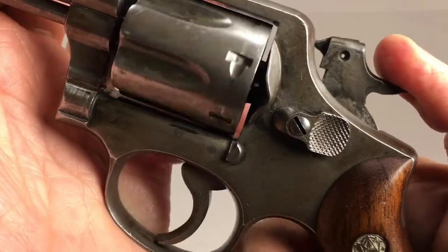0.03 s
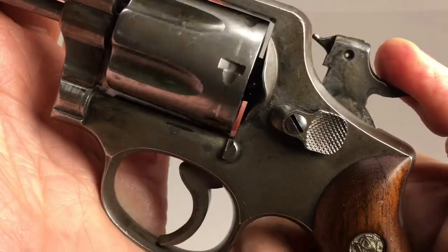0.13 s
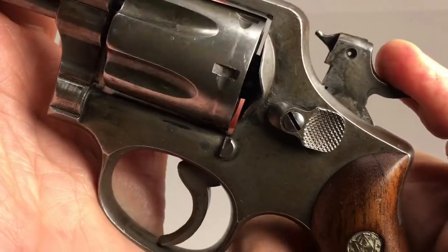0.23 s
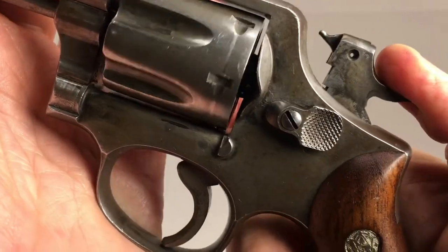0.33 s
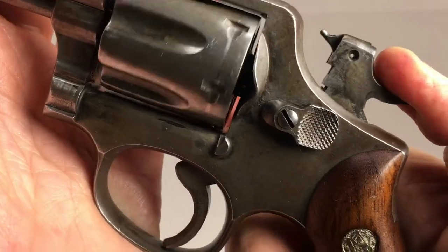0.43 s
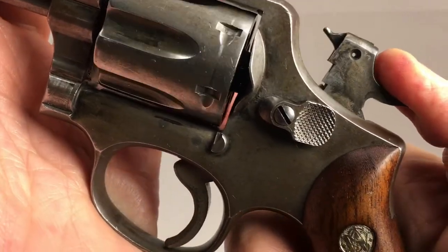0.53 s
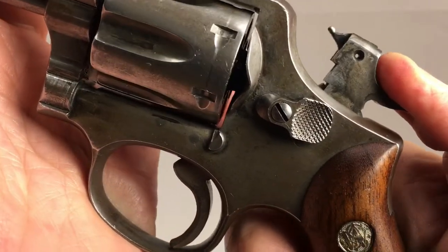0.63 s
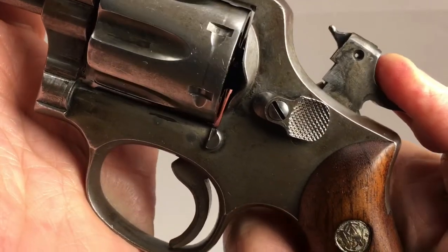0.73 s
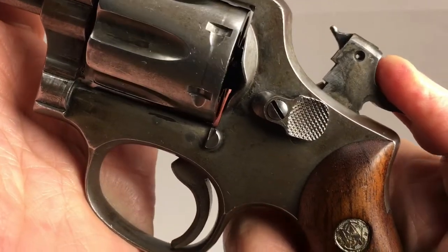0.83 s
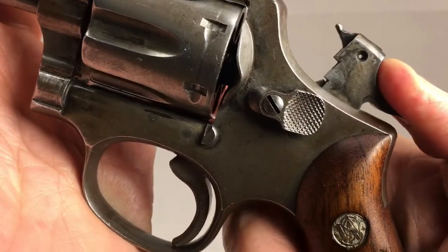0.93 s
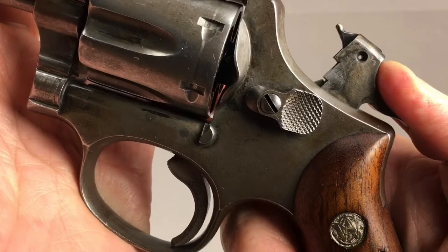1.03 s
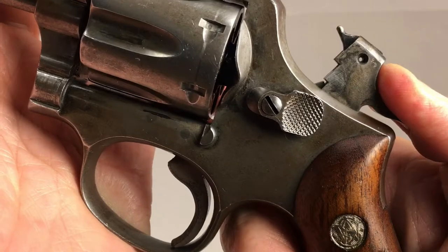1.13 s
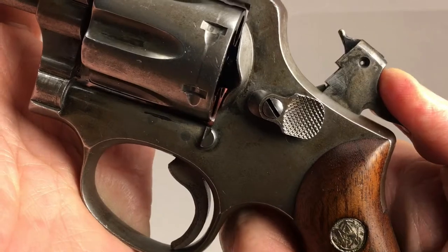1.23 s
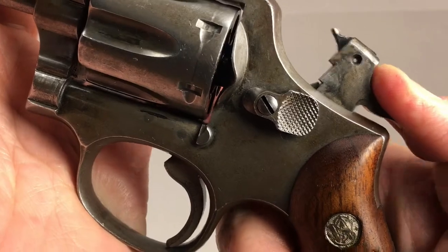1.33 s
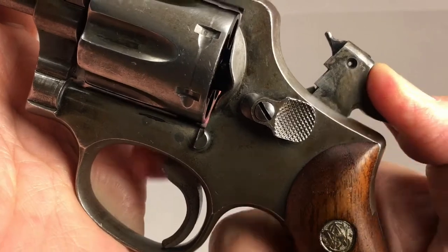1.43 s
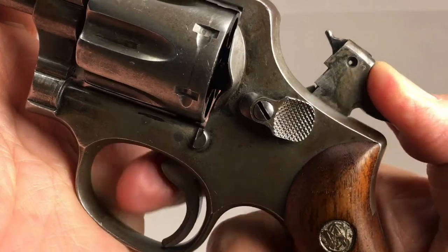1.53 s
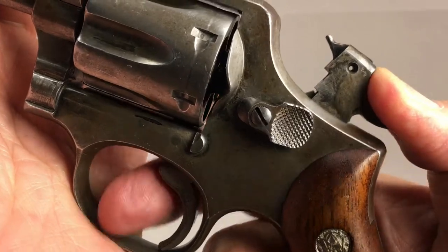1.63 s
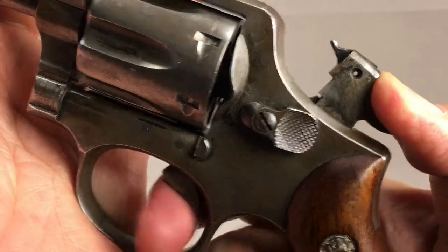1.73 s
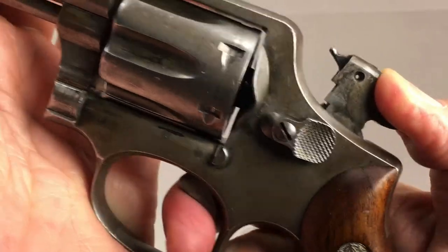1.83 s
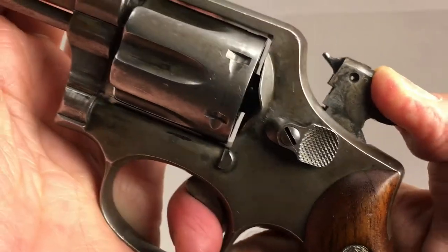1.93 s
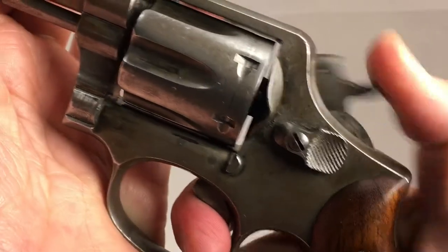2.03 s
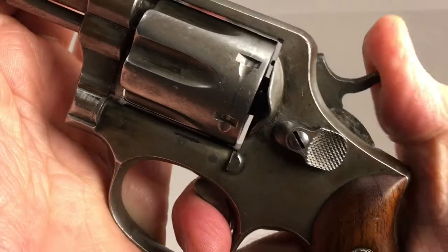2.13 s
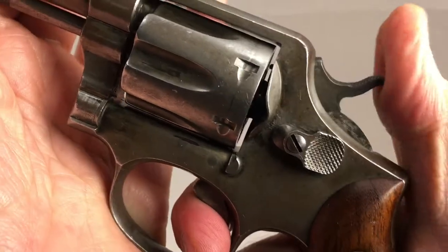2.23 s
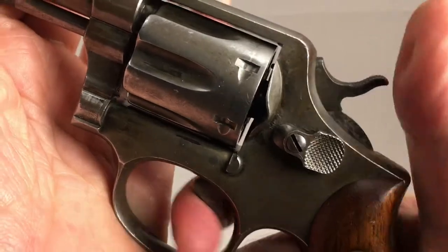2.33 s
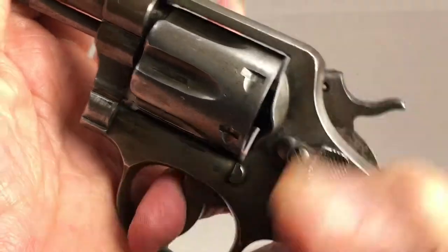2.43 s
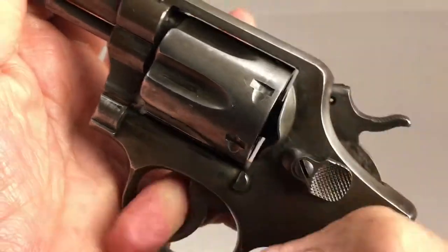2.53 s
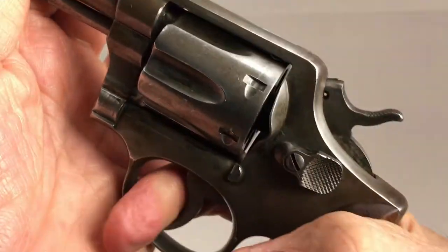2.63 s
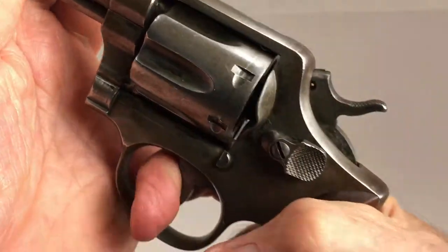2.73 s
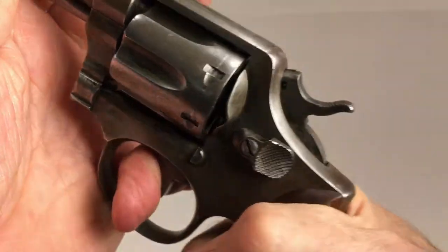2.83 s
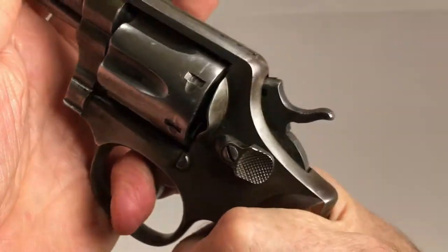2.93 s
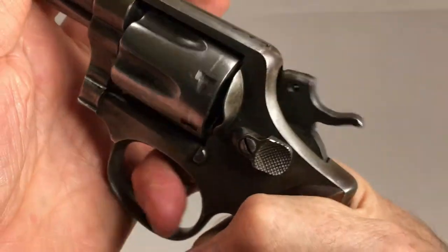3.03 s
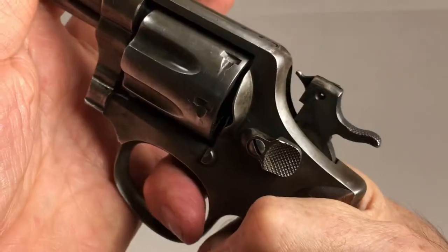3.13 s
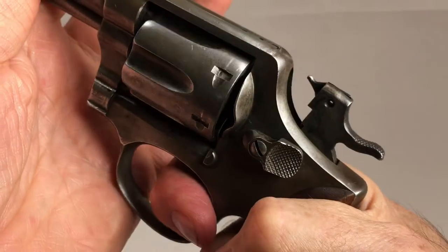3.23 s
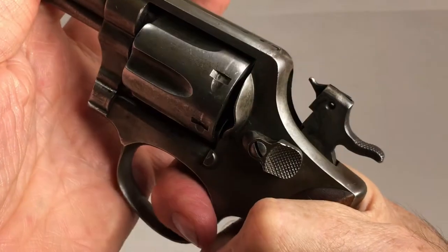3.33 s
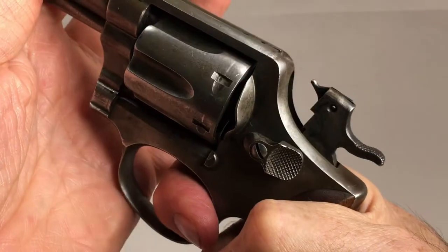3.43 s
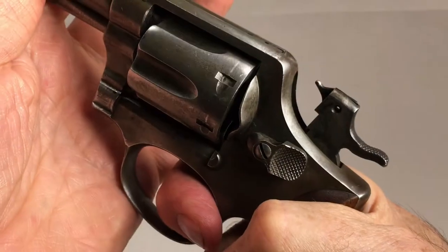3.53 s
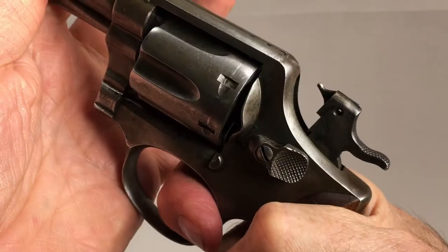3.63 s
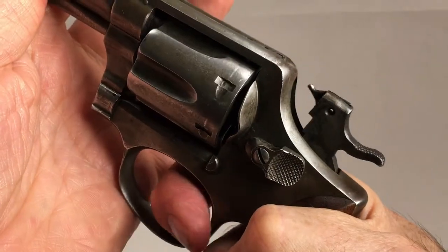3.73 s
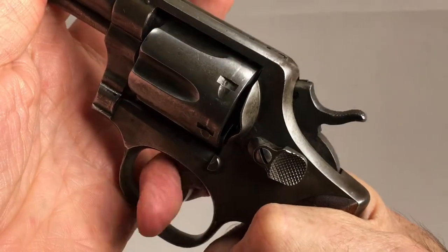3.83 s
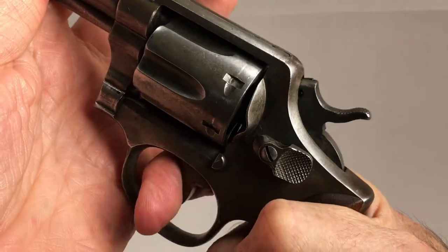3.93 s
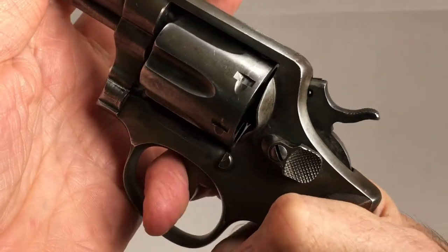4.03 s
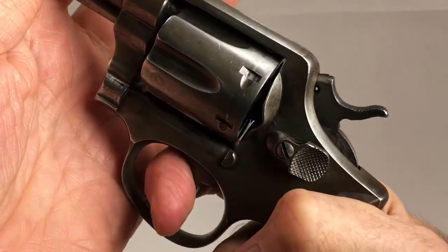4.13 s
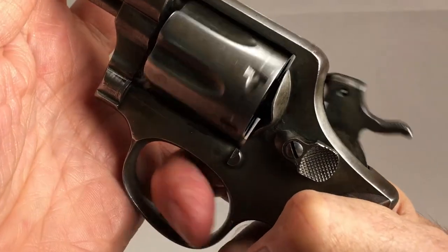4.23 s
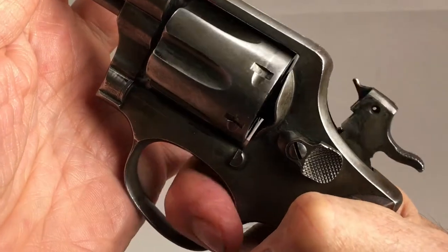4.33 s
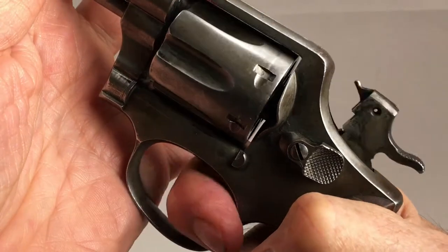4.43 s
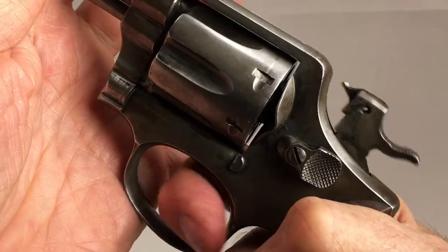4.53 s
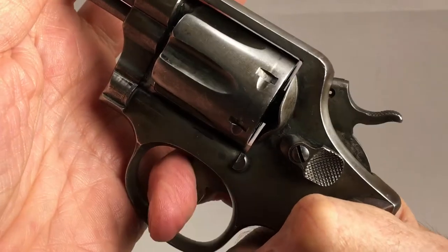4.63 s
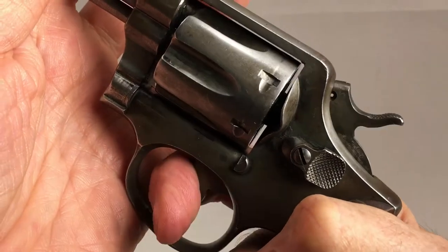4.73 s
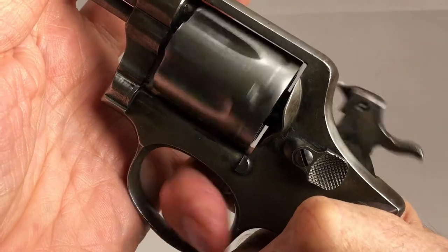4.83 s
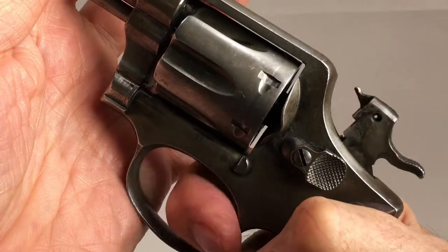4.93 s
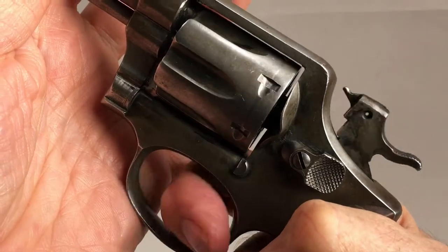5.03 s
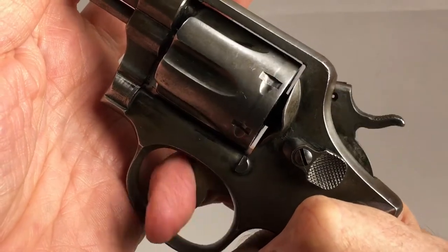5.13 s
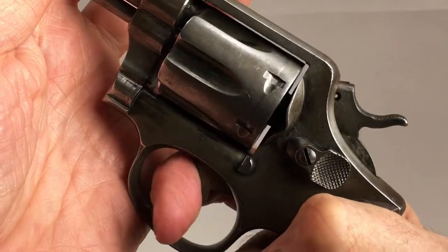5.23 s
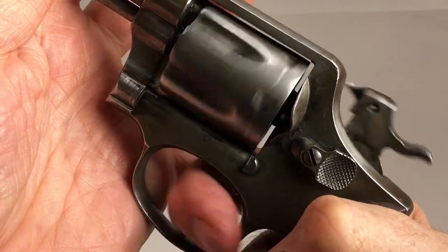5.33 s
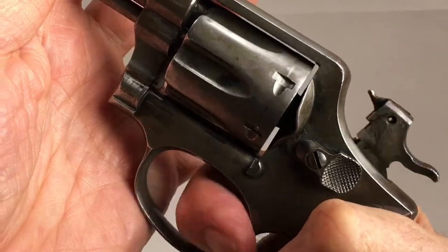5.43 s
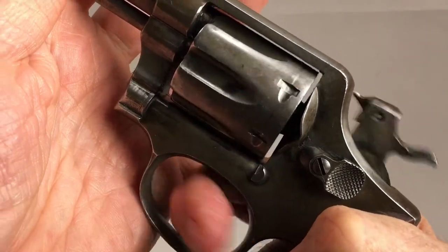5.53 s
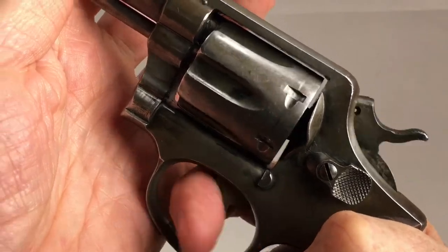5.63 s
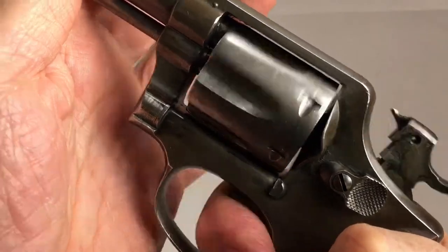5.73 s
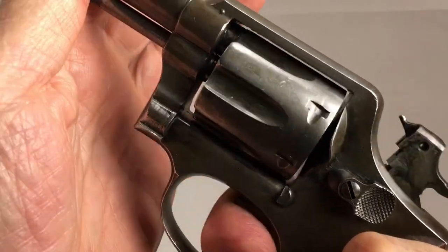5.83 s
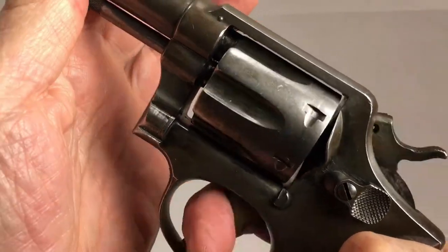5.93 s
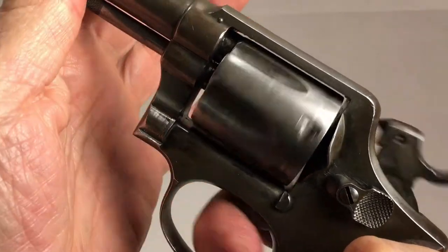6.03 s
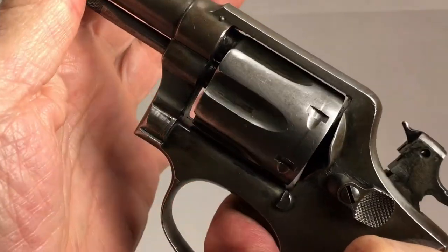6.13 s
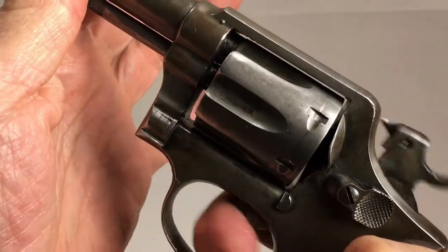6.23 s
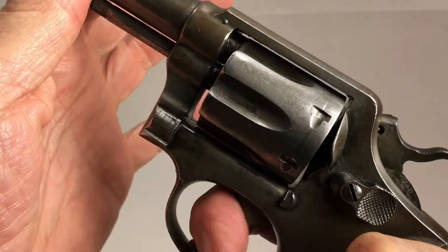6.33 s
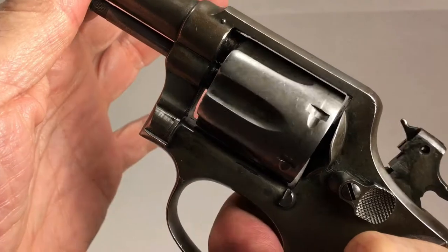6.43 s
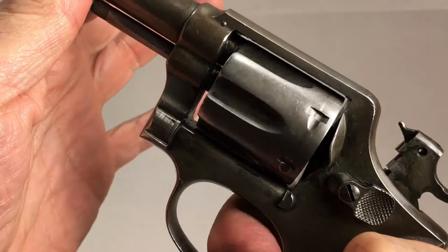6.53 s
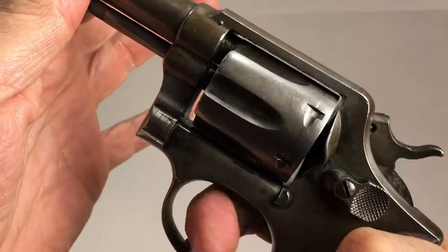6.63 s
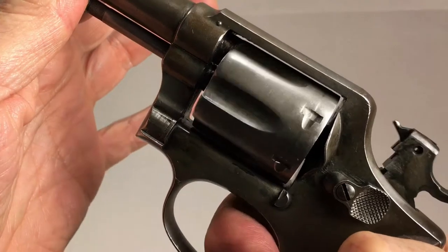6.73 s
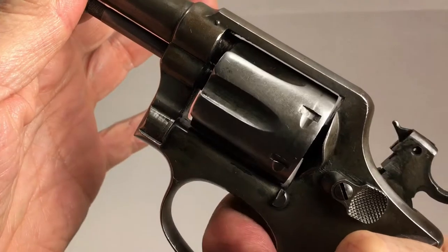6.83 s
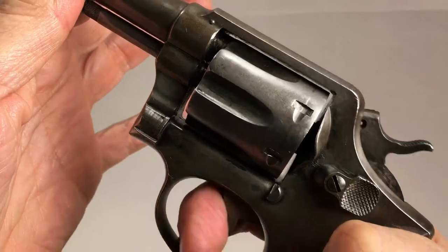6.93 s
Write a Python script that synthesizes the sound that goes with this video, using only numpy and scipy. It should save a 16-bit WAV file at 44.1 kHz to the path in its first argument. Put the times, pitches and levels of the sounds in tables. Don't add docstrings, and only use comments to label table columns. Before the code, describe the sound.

Close metallic revolver clicks, first slow and separate, then fast clustered snaps as the trigger is pulled repeatedly, over faint hiss and room hum.

```python
import sys
import numpy as np
from scipy import signal
from scipy.fft import rfft, irfft
from scipy.io import wavfile
from scipy.ndimage import uniform_filter1d

SR = 44100
rng = np.random.default_rng(int(sys.argv[2]) if len(sys.argv) > 2 else 0)


def put_to_file(sound):
    columns = np.atleast_2d(sound).T
    safe = np.clip(columns, -1, 1)
    whole_steps = np.round(safe * 32767)
    wavfile.write(sys.argv[1], SR, whole_steps.astype(np.int16))


def convert_level_to_amplitude(level_db):
    exponent = np.asarray(level_db, float) / 20
    return 10 ** exponent


N = 308700
STRIKE_S = np.arange(2048) / SR
STRIKE_HZ = np.fft.rfftfreq(2048, 1 / SR) + 1

# start in seconds, strength in dB, loudest part in Hz,
# overload thump in dB, bounce in dB.
BOLT_SPRINGS_UP = [(4.3293, -3.5, 8280, -12.5, -14), (4.9152, -1.5, 4235, -10, -18.5),
                   (5.4113, 2, 3670, -10, -20), (5.7905, -1.5, 2173, -9, -17),
                   (6.1238, -12.5, 2020, -10, -11.5), (6.4767, -5, 1406, -9.5, -9.5),
                   (6.7881, -13.5, 2397, -10, -10.5)]
# start in seconds, strength in dB, loudest part in Hz,
# overload thump in dB, bounce in dB.
BOLT_DROPS_IN = [(4.3547, -1.5, 6046, -11.5, -7), (4.9355, 1.5, 3300, -11, -21.5),
                 (5.4295, -2, 8030, -14.5, -6.5), (5.8098, 1, 6660, -14, -20), (6.14, 3, 5740, -13, -18),
                 (6.4968, -2, 6630, -8.5, -7.5), (6.8097, 0.4, 8480, -13.5, -11)]
# start in seconds, strength in dB, loudest part
# in Hz, overload thump in dB, overload spike in dB.
BOLT_SLOW_CLICKS = [
    (.33415, -4.5, 5850, -11, -7),
    (0.693, -7.5, 8270, -26, -11),
    (3.1559, -3, 8640, -17.5, -15),
    (3.32525, -7, 7120, -18, -8),
]


def read(points, hz):
    f, value = np.transpose(points)
    return np.interp(np.log(hz + 1), np.log(f + 1), value)


def evened(x):
    return x / np.sqrt(np.mean(x ** 2) + 1e-20)


def add(mix, s, sound):
    part = mix[round(s * SR):][:len(sound)]
    part += sound[:len(part)]


def noise(spectrum):
    gain = convert_level_to_amplitude(read(spectrum, np.fft.rfftfreq(N, 1 / SR)))
    return evened(irfft(rfft(rng.standard_normal(N)) * gain, N))


def level(curve):
    return convert_level_to_amplitude(np.interp(np.arange(N) / SR, *np.transpose(curve)))


def causal(gain):
    log_gain = np.log(np.r_[gain, gain[-2:0:-1]] + 1e-4)
    return np.fft.ifft(np.exp(np.conj(signal.hilbert(log_gain)))).real


def bolt_contacts():
    # brightness in octaves about the middle, loudest part in dB, ring time in ms
    up, into, slow = (0.56, -2, 17), (0.58, -2.3, 15.8), (.9, -6.5, 24)
    bounce, lead_tick = (0.39, 0, 32), (0.83, -12, 14)
    rows = [(s, db, hz, slow) for s, db, hz, _, _ in BOLT_SLOW_CLICKS]
    # table, tone, bounce delay in ms, bounce Hz, lead tick time in ms, lead tick dB
    for table, tone, bounce_ms, bounce_hz, lead_ms, lead_db in (
            (BOLT_SPRINGS_UP, up, 2.4, 8000, -5, -37.5),
            (BOLT_DROPS_IN, into, 1.8, 5700, -2.3, -39.5)):
        for s, db, hz, _, bounce_db in table:
            rows.append((s, db, hz, tone))
            rows.append((s + bounce_ms / 1000, bounce_db, bounce_hz, bounce))
            rows.append((s + lead_ms / 1000, lead_db, bounce_hz, lead_tick))
    return rows


def rest_contacts():
    # start in seconds, strength in dB, loudest part in Hz, rebound delay in ms, rebound in dB.
    rests = [(3.898, -2.5, 6026, 1.7, 2.8), (4.6451, -1.5, 8600, 1.9, 5.5), (5.1753, -1.5, 8280, .8, 5.5),
             (5.6215, 7.5, 5740, 2.3, 2), (5.964, -1.3, 5990, 1.8, 2.5), (6.3273, 3.5, 2500, 1.7, 2.5),
             (6.6621, 1.5, 2566, 2.8, 4.5), (6.9682, -2.5, 2450, 0.84, 5)]
    # (brightness in octaves, loudest part in dB, ring time in ms).
    rattle = [
        (-9.5, -32.5, 8500, (0.67, -14.5, 31)),
        (-5, -36.5, 5900, (.6, -7.5, 20)),
        (-1.5, -11, 28000, (0.98, 10.5, 34)),
    ]
    rest, rebound, settle = (1, -7, 14), (0.51, -12, 17.8), (-.1, 3.8, 28)
    rows = []
    for s, db, hz, ms, rebound_db in rests:
        top_db = max(db, rebound_db)
        rows.append((s, db, hz, rest))
        rows.append((s + ms / 1000, rebound_db, min(hz, 6100), rebound))
        rows.append((s + 5.8 / 1000, top_db - 18.5, min(hz, 3900), settle))
        rows += [(s + at / 1000, top_db + under_db, f, tone) for at, under_db, f, tone in rattle]
    return rows


def sear_contacts():
    # start in seconds, strength in dB, loudest part in Hz, rebound delay in ms, rebound in dB.
    catches = [
        (0.9575, 0, 5780, 2.4, -10.5),
        (1.814, -18.5, 3960, 1.3, -16.5),
        (2.1096, 0.3, 8300, 1.8, -8.5),
        (2.4576, 2, 4400, 1.7, -15.5),
    ]
    rows = []
    for s, db, hz, ms, rebound_db in catches:
        tone = (0.65 + 0.031 * db, -1, 20)
        rows.append((s, db, hz, tone))
        rows.append((s + ms / 1000, rebound_db, min(hz, 5300), tone))
    return rows


def small_contacts():
    # start in seconds, strength in dB, loudest part in Hz.
    pawls = [(2.9507, -31, 3870), (3.0765, -46, 4400), (3.0837, -32, 2560), (4.287, -37, 5430),
             (4.2913, -29, 3300), (4.8812, -39, 5300), (4.8853, -23, 6150), (5.3806, -43, 5870),
             (5.382, -23, 3530), (5.3977, -32, 5460), (5.755, -27, 3370), (6.0907, -26.5, 3400),
             (6.4448, -29, 2800), (6.7559, -25.5, 2630)]
    # start in seconds, strength in dB, loudest part in Hz.
    resets = [(2.0874, -41.5, 5500), (2.4226, -34, 8470), (2.4281, -30.5, 4510), (2.4383, -29, 8960),
              (2.4408, -37.5, 4520), (3.8718, -42, 4280), (3.8852, -37.5, 5400), (4.6005, -38, 5700),
              (4.6124, -31, 6120), (4.6308, -38.5, 4270), (5.5954, -36, 8200), (5.9352, -33, 7800),
              (5.9522, -38, 6200), (6.2867, -37, 9500), (6.2941, -34, 7900), (6.634, -32, 10600),
              (6.64, -30, 7450), (6.9412, -38, 11300), (6.9462, -27.5, 7790)]
    # start in seconds, strength in dB,
    # loudest part in Hz, brightness in octaves.
    ticks = [(0.3107, -40, 3690, -1.5), (0.3217, -46, 3110, -0.88), (1.8119, -24, 3900, .1),
             (0.6944, -11.5, 8400, 0.67), (.9346, -48, 5910, 0.38), (2.1057, -26, 3600, -0.26),
             (2.1063, -21, 3400, -0.14), (2.4494, -21, 3900, .3), (2.4547, -0.5, 4625, 0.34),
             (2.4615, -19, 3900, -.1), (3.132, -48, 7100, .5), (3.156, -19.5, 6600, 1),
             (1.4252, -34.5, 3900, -1.33), (1.86, -43, 5300, 0.12), (2.394, -28.5, 2100, -.5),
             (2.3957, -16.5, 3313, -0.48), (2.482, -32.5, 3900, -0.45), (2.5335, -51, 4850, .1),
             (3.0981, -41, 6000, .2), (3.2604, -45, 5700, .4), (3.7632, -55, 7500, 0.12),
             (3.817, -47, 2490, -0.048), (3.8373, -46.5, 3900, -0.63), (5.3277, -35, 6220, -.5),
             (5.3363, -34, 8960, .4), (5.459, -30.5, 6000, -.1), (5.4763, -47, 3900, -.2),
             (5.8208, -25, 5900, -0.56), (6.337, -16, 2820, 0.64)]
    rows = [(s, db, hz, (-0.52, -1.2, 25.5)) for s, db, hz in pawls]
    rows += [(s, db, hz, (.45, -4, 27)) for s, db, hz in resets]
    return rows + [(s, db, hz, (bright, -1, 22)) for s, db, hz, bright in ticks]


def strike_colour(part_hz, bright, part_db):
    # frequency in Hz, level in dB.
    frame = [(180, -49.5), (300, -21.5), (1720, -8), (2030, -5.5), (2740, -8), (3900, -1.5), (5020, -9),
             (5930, -3.5), (7380, -6), (9020, -5), (9980, -9), (14000, -10), (15700, -12), (16500, -13.5)]
    bell = convert_level_to_amplitude(read(frame, STRIKE_HZ) - 2.1 * (np.log2(STRIKE_HZ / 5000) - bright) ** 2)
    peak = 1 / (1 + ((STRIKE_HZ - part_hz) / (0.12 * part_hz)) ** 2)
    return bell, bell.max() * convert_level_to_amplitude(part_db + 4.5) * peak


def steel_blow(bell, part, part_hz, part_db, ring_ms):
    chance = rng.standard_normal(len(STRIKE_S))
    crack = causal(bell + .5 * part)
    fade = convert_level_to_amplitude(-60 * STRIKE_S / (ring_ms / 1000))
    dense = evened(irfft(rfft(chance) * bell, len(STRIKE_S))) * fade * np.minimum(STRIKE_S / 0.00048, 1)
    waver = .1 * np.cumsum(chance)
    mode = np.sin(2 * np.pi * part_hz * STRIKE_S + waver) * fade ** 1.3
    return np.sign(chance[0]) * crack / abs(crack).max() + 0.27 * dense + convert_level_to_amplitude(part_db - 8.5) * mode


def sent_into_room(colour):
    # frequency in Hz, width in Hz, lift in dB.
    metal_lines = [(2130, 70, 4.5), (2570, 75, 5.5), (2760, 70, 5.5), (3370, 110, 6), (4600, 130, 6),
                   (5300, 95, 5), (5760, 130, 5), (6580, 100, 3.5), (7470, 120, 3.5), (8720, 220, 4)]
    shift = 1 + .012 * rng.standard_normal()
    lines_db = 0
    for f, width, lift in metal_lines:
        lift = lift * (1 + .8 * np.tanh(rng.standard_normal()))
        lines_db = lines_db + lift / (1 + ((STRIKE_HZ - f * shift) / width) ** 2)
    return causal(colour * convert_level_to_amplitude(lines_db))


def body_knock():
    # frequency in Hz, level in dB, seconds to fade by 60 dB.
    body = [(164, -39, .05), (410, -39.5, .05), (816, -40.5, 0.049), (1110, -40, 0.052),
            (1256, -34.5, 0.028), (1426, -31.5, 0.024), (2120, -32, 0.023), (2580, -31.5, 0.01)]
    knock = np.zeros(len(STRIKE_S))
    for f, body_db, t60 in body:
        luck = rng.standard_normal()
        fade = convert_level_to_amplitude(body_db + 1.9 * luck - 60 * STRIKE_S / t60)
        knock += fade * np.sin(2 * np.pi * f * (1 + luck / 50) * STRIKE_S)
    return knock


def spring_ring(part_hz):
    # frequency in Hz, level in dB, seconds to fade by 60 dB.
    springs = [(2460, -49.5, 0.15), (2800, -46.5, 0.13)]
    t = np.arange(9000) / SR
    ring = np.zeros(len(t))
    for f, spring_db, t60 in springs:
        luck = rng.standard_normal()
        struck_db = 10.0 * np.exp(-(np.log2(f / part_hz) / .15) ** 2)
        tone = np.sin(2 * np.pi * f * (1 + 0.0044 * luck) * t) * np.cos(40 * luck * t)
        ring += tone * convert_level_to_amplitude(spring_db + struck_db + 2.0 * luck - 60 * t / t60)
    return ring


def action():
    near, around = np.zeros(N), np.zeros((5, N))
    contacts = small_contacts() + bolt_contacts() + sear_contacts() + rest_contacts()
    for k, (s, db, part_hz, (bright, part_db, ring_ms)) in enumerate(contacts):
        bell, part = strike_colour(part_hz, bright, part_db)
        blow = steel_blow(bell, part, part_hz, part_db, ring_ms)
        add(near, s, convert_level_to_amplitude(db + 4.5) * blow)
        spread = sent_into_room(bell + .5 * part)
        spread *= np.linalg.norm(blow) / np.linalg.norm(spread)
        add(around[k % len(around)], s, convert_level_to_amplitude(db + 5) * spread)
        add(near, s, convert_level_to_amplitude(db) * body_knock())
        add(near, s, convert_level_to_amplitude(db) * spring_ring(part_hz))
    return near, around


def overloads():
    # start in seconds, thump in dB.
    jolts = [(2.4567, -28), (4.646, -26), (5.6247, -48.5), (5.9641, -29.5), (6.3284, -33), (6.6635, -14.5),
             (6.9697, -14.5)]
    rows = [(row[0], row[3], -10.5) for row in BOLT_SPRINGS_UP]
    rows += [(row[0], row[3], -12) for row in BOLT_DROPS_IN]
    rows += [(row[0], row[3], row[4]) for row in BOLT_SLOW_CLICKS]
    return rows + [(s, db, db + 4) for s, db in jolts]


def thumps():
    out, ms = np.zeros(N), np.arange(2000) / SR * 1000
    swing = np.sin(np.pi * (ms ** .25 - .49) / .292)
    slow = swing * np.exp(-ms / 7.2) * np.minimum(ms / 1.8, 1)
    slow *= np.cos(np.pi / 2 * ms / ms[-1])
    u = (ms - .14) / .065
    spike = 1.9 * u * np.exp(-u ** 2 / 2) + .62 * swing * np.exp(-ms / .8) * (u > 0)
    ahead = ms[:600] - ms[599]
    warning = np.sin(2 * np.pi * 3.1 * ahead) * np.exp(ahead / 4.6)
    warning -= 3 * np.sin(2 * np.pi * .17 * ahead) * np.exp(ahead / 2.5)
    for s, thump_db, spike_db in overloads():
        add(out, s, convert_level_to_amplitude(thump_db + 1.0) * slow)
        add(out, s - 3 / SR, convert_level_to_amplitude(spike_db + 1.5) * spike)
        add(out, s + ahead[0] / 1000, convert_level_to_amplitude(thump_db - 29.5) * warning)
    return out


def hands():
    # start in seconds, peak level in dB, pitch in Hz.
    bumps = [
        (1.85, -47, 59),
        (2.736, -34, 56.7),
        (2.92, -50, 55),
    ]
    # time in seconds, level in dB.
    scuff = [(2.68, -82), (2.73, -46.5), (2.78, -49), (2.83, -62), (2.88, -86)]
    # time in seconds, level in dB.
    rub = [(2.799, -88), (2.86, -70.5), (2.875, -61), (2.92, -58), (2.94, -69), (2.971, -73)]
    out, t = np.zeros(N), np.arange(4000) / SR
    for s, db, hz in bumps:
        add(out, s, convert_level_to_amplitude(db) * np.sin(2 * np.pi * hz * t) * np.hanning(len(t)))
    grain = convert_level_to_amplitude(2.5 * evened(uniform_filter1d(rng.standard_normal(N), 300)))
    dull = noise([(50, -11.5), (150, 8.5), (500, -9.0), (1200, -19), (16000, -73.5)])
    out += level([(0.014, -120)] + scuff + [(3, -120)]) * grain * dull
    airy = noise([(1000, -23), (4000, -11), (6200, -4.0), (9000, -11.5), (15500, -11.5), (16500, -28.5)])
    return out + level([(0.0073, -120)] + rub + [(4, -120)]) * airy


def room(feeds):
    # frequency in Hz, seconds to fade by 60 dB.
    fade_times = [(300, 0.16), (1300, 0.12), (3500, 0.31), (9000, 0.25), (15000, 0.16)]
    colour = [(300, -6.5), (800, 6.5), (1500, -1.0), (3500, -11.0), (9000, -11.0), (15000, -7.0)]  # Hz, dB
    out = np.zeros(N)
    for x in feeds:
        taps = np.zeros(SR // 2)
        at = np.arange(150, len(taps) - 12, 12)
        taps[at + rng.integers(0, 12, len(at))] = rng.choice([-1., 1.], len(at))
        hz, t, z = signal.stft(taps, SR, nperseg=256)
        fade_db = read(colour, hz)[:, None] - 60 * t / read(fade_times, hz)[:, None]
        tail = signal.istft(z * convert_level_to_amplitude(fade_db), SR, nperseg=256)[1]
        out += signal.fftconvolve(x, tail / np.linalg.norm(tail))[:N]
    return out


def hum():
    # frequency in Hz, level in dB per Hz.
    hum_colour = [(18, -55.5), (30, -0.5), (91, -14), (118, -1), (154, -8.5), (190, -1.5), (268, -16.5),
                  (368, -19.5), (443, -33.5), (547, -27.5), (1030, -36), (14500, -64.5), (16500, -79)]
    s, thump_db, _ = np.transpose(overloads())
    t = np.arange(0, N / SR + .01, .01)
    since = np.maximum(t - s[:, None], 0)
    depth_db = 0.42 * np.maximum(thump_db + 31.5, 0)[:, None]
    duck_db = depth_db * np.minimum(since / .04, 1) * np.exp(-(since / 0.25) ** 2)
    return level(np.c_[t, -49 - duck_db.max(0)]) * noise(hum_colour)


def hiss(dry):
    # frequency in Hz, level in dB per Hz.
    hiss_colour = [(200, 6), (800, 1.5), (2000, -3.5), (5000, -4), (9500, -8.5), (15200, -13), (16500, -45)]
    hold_s = 0.413
    loud_peak = np.r_[1, abs(dry[0]) > .4]
    count = np.arange(N + 1)
    since = (count - np.maximum.accumulate(loud_peak * count))[1:] / SR
    since[:np.argmax(loud_peak[1:])] += hold_s - .018
    gain = uniform_filter1d(np.where(since < hold_s, 1, convert_level_to_amplitude(-11.0)), 90)
    return convert_level_to_amplitude(-61.5) * gain * noise(hiss_colour)


def scene():
    # delay in seconds, level in dB.
    far_walls = [
        (.030, -33),
        (.081, -44),
    ]
    near, around = action()
    mix = near + convert_level_to_amplitude(-19.0) * room(around) + hands() + hum()
    for s, db in far_walls:
        add(mix, s, convert_level_to_amplitude(db) * near)
    return mix[None]


def top_cut(x):
    return signal.sosfilt(signal.butter(12, 16860, fs=SR, output="sos"), x)


def record(dry):
    x = signal.sosfilt(signal.butter(4, 40, "high", fs=SR, output="sos"), dry)
    x = np.tanh(x * 0.75) + hiss(dry)
    x = signal.sosfilt(signal.ellip(7, .2, 45, 15600, fs=SR, output="sos"), x) + thumps()
    x = signal.sosfilt(signal.butter(8, 16400, fs=SR, output="sos"), x)
    return top_cut(np.clip(x, -1, 1))


dry = scene()
out = record(dry)
put_to_file(out)
```